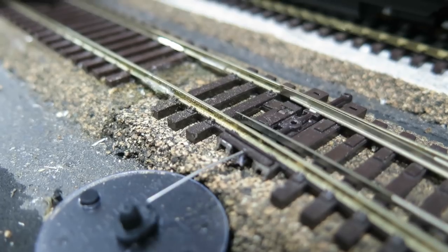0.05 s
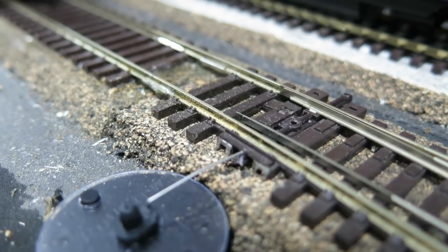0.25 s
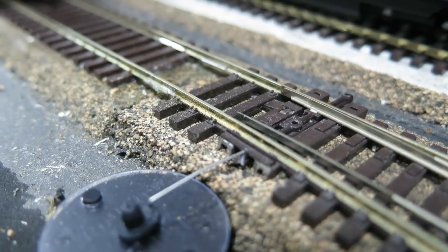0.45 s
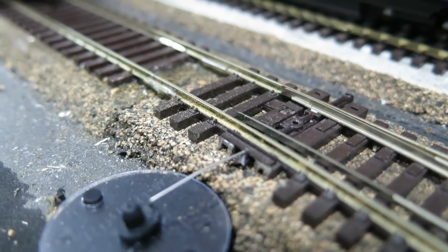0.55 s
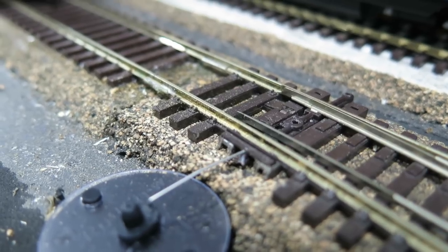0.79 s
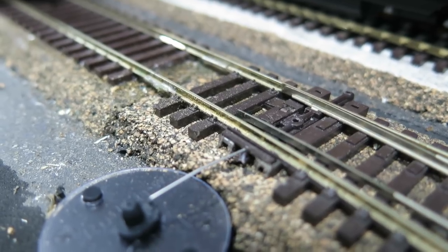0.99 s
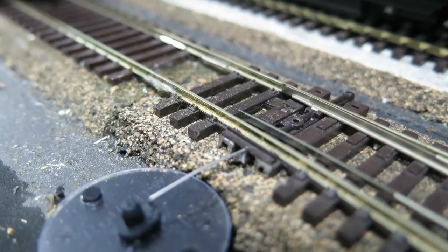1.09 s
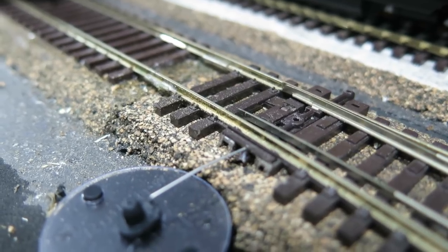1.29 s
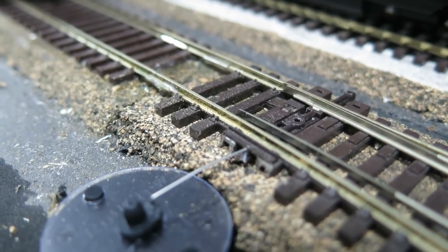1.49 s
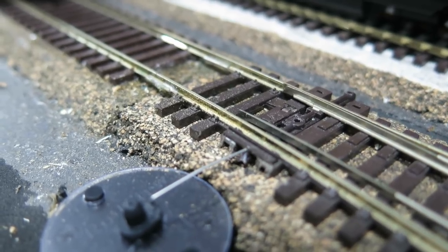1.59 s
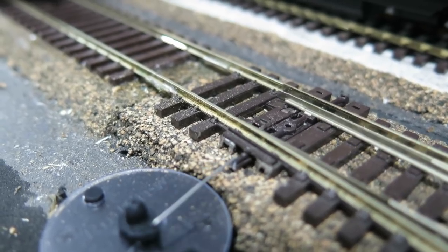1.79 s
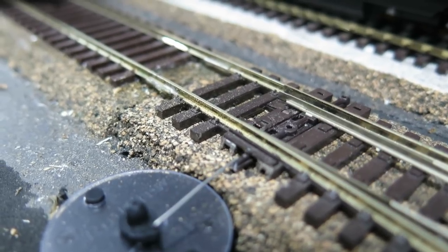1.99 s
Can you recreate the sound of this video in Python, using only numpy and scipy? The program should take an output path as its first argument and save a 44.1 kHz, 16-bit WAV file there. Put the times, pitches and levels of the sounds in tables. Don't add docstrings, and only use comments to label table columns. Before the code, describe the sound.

Close up in a small indoor room, a miniature track switch gives a faint tick, a sharp clack, lighter ticks, then a second clack and last ticks, over soft hiss that dips after each snap.

```python
import sys
import numpy as np
from scipy import signal
from scipy.fft import rfft, irfft
from scipy.io import wavfile
from scipy.ndimage import uniform_filter1d

SR = 44100
rng = np.random.default_rng(int(sys.argv[2]) if len(sys.argv) > 2 else 0)


def voltage_ratio(decibels):
    exponent = np.asarray(decibels, float) / 20
    return 10 ** exponent


def pcm_store(signal):
    levels = np.round(np.clip(np.atleast_2d(signal), -1, 1) * 32767)
    wavfile.write(sys.argv[1], SR, levels.astype(np.int16).T)


N = 90404


def evened(x):
    return x / np.sqrt(np.mean(x ** 2) + 1e-20)


def on_log_axis(points, hz):
    f, value = np.transpose(points)
    return np.interp(np.log(hz + 1), np.log(f + 1), value)


def add(mix, s, sound):
    part = mix[:, round(s * SR):][:, :sound.shape[1]]
    part += sound[:, :part.shape[1]]


def resonate(x, hz, width):
    turn = np.exp(2j * np.pi * hz * np.arange(len(x)) / SR)
    decay = np.exp(-np.pi * width / SR)
    envelope = signal.lfilter([1 - decay], [1, -decay], x / turn)
    return 2 * (turn * envelope).real


def hum():
    # f/Hz, bandwidth/Hz, level/dB
    partials = [(62.4, 6, -54), (108.3, 4, -57), (213.6, 20, -64)]
    total = 0
    for f, width, db in partials:
        once = resonate(rng.standard_normal(N), f, width)
        total = total + voltage_ratio(db) * evened(resonate(once, f, width))
    return total


def air():
    # f/Hz, density/dB per Hz
    spectrum = [(15, -46), (25, -8), (41, -9), (65, -5), (202, -6.5), (304, -10.5), (3510, -25.5),
                (15200, -36.5), (16500, -50.5)]
    # f/Hz, correlation
    likeness = [(60, 1), (130, 0.28), (290, 0.035), (640, 0.096), (1410, 0.12), (3100, 0.64), (6820, 0.63),
                (15000, -0.31)]
    level_db, patchy_db = -46.5, 1.0
    frames, hz = N // 512 + 5, np.fft.rfftfreq(2048, 1 / SR)
    a, b, c, d, patches = rng.standard_normal((frames, 1025, 5)).T
    patches = uniform_filter1d(patches, size=10, axis=0)
    patches = evened(uniform_filter1d(patches, size=5, axis=1))
    same = np.clip(on_log_axis(likeness, hz), -1, 1)[:, None]
    left = a + 1j * b
    right = same * left + np.sqrt(1 - same ** 2) * (c + 1j * d)
    z = np.array([left, right]) * voltage_ratio(on_log_axis(spectrum, hz)[:, None] + patchy_db * patches)
    wash = signal.istft(z, nperseg=2048, noverlap=1536)[1][:, :N]
    return voltage_ratio(level_db) * evened(wash)


def room(x):
    # f/Hz, T60/s
    t60 = [(250, 0.45), (700, 0.4), (1800, 0.26), (4600, 0.35), (12000, .2)]
    # f/Hz, level/dB
    tail_colour = [(250, -0.5), (1000, 4), (4000, 6), (9000, 2), (15000, 5)]
    level_db, same, onset_s = -6, 0.6, 0.0029
    a, b = rng.standard_normal((2, 20000))
    noise = [a, same * a + np.sqrt(1 - same ** 2) * b]
    hz, t, z = signal.stft(noise, SR, nperseg=128)
    decay_db = -60 * t / on_log_axis(t60, hz)[:, None]
    z = z * voltage_ratio(on_log_axis(tail_colour, hz)[:, None] + decay_db)
    tail = signal.istft(z, SR, nperseg=128)[1]
    tail = tail * np.minimum(np.arange(tail.shape[1]) / SR / onset_s, 1)
    tail = tail / np.linalg.norm(tail[0])
    return voltage_ratio(level_db) * signal.fftconvolve(x[None], tail, axes=1)[:, :N]


def near(x):
    level_db, t60_s, onset_s = -4.5, 0.05, 0.0008
    t = np.arange(4000) / SR
    tail = rng.standard_normal((2, len(t))) * voltage_ratio(-60 * t / t60_s) * np.minimum(t / onset_s, 1)
    tail = tail / np.linalg.norm(tail[0])
    return voltage_ratio(level_db) * signal.fftconvolve(x[None], tail, axes=1)[:, :N]


def ports(x):
    # f/Hz, left over right/dB
    balance = [(60, 5.5), (180, 10), (550, -1), (1650, 4.5), (4970, 0.5), (15000, -4.5)]
    lag_s = 2.4e-5
    hz = np.fft.rfftfreq(N, 1 / SR)
    half = voltage_ratio(on_log_axis(balance, hz) / 2) * np.exp(1j * np.pi * hz * lag_s)
    return irfft(rfft(x) * np.array([half, 1 / half]), N)


def duck_db(t):
    # t/s, depth/dB
    trips = [
        (0.216, 14.5),
        (1.755, 13.5),
    ]
    attack_s, hold_s, release_s = 0.0066, 0.15, 0.89
    loss = 0
    for s, depth_db in trips:
        age = np.maximum(t - s, 0)
        fall = 1 - np.exp(-age / attack_s)
        recovery = np.clip(1 - (age - hold_s) / release_s, 0, 1)
        loss = loss + depth_db * fall * recovery
    return loss


def ring(drive, bright_hz, spread, knock_db):
    # f/Hz, bandwidth/Hz, level/dB
    body = [(2270, 250, 1), (2980, 420, 3), (4400, 720, 1), (4930, 350, 3), (5620, 410, 4), (6870, 480, 4),
            (7570, 980, -2), (8500, 340, 1.5), (9200, 400, 3.5), (10750, 1100, 1.5), (12370, 560, -1.5),
            (13800, 900, -1.5), (15300, 610, -13)]
    # f/Hz, bandwidth/Hz, level/dB
    board = [(235, 53, -17.5), (690, 120, -4.5), (926, 130, -8.5), (1195, 87, -4), (1880, 190, -3.5)]
    board_hz, board_spread, around_db, around_top_hz = 1115, 1.377, -5.5, 10900
    modes = [(hz, w, db - 6 * (np.log2(hz / bright_hz) / spread) ** 2) for hz, w, db in body]
    modes += [(hz, w, db + knock_db + 5) for hz, w, db in board]
    front = 0
    for k, (hz, width, db) in enumerate(modes):
        front = front + (-1) ** k * voltage_ratio(db) * resonate(drive, hz, width)
    hz = np.fft.rfftfreq(len(drive), 1 / SR) + 1
    body_colour = voltage_ratio(-6 * (np.log2(hz / bright_hz) / spread) ** 2)
    board_colour = voltage_ratio(knock_db + 3.5 - 2.95 * (np.log2(hz / board_hz) / board_spread) ** 2)
    colour = (body_colour + board_colour) / (1 + (hz / around_top_hz) ** 4)
    delay = np.exp(-2j * np.pi * hz / 1000)
    around = irfft(rfft(drive) * colour * delay, len(drive))
    return np.array([front, voltage_ratio(around_db) * around])


def blow(s, db, bright_hz, spread, knock_db):
    chatter, chatter_s = 0.22, 0.00041
    t = np.arange(1500) / SR
    drive = (t == 0) + chatter * rng.standard_normal(len(t)) * np.exp(-t / chatter_s)
    sound = ring(drive, bright_hz, spread, knock_db)
    onset_rms = np.sqrt(np.mean(sound[0, :50] ** 2))
    return s, voltage_ratio(db + duck_db(s)) * sound / onset_rms


def board_thuds():
    thud_s = [
        .0901,
        .5142,
        2.0093,
    ]
    # level/dB, brightest f/Hz
    thud_rows = [(-39.5, 2120), (-34, 2100), (-40.5, 1900)]
    thuds = np.zeros((2, N))
    for s, row in zip(thud_s, thud_rows):
        add(thuds, *blow(s, *row, 0.55, 9.7))
    return thuds


def lever_ticks():
    tick_s = [.0893, .0899, .4672, .4684, .5134, 1.5987, 1.6341, 1.9933, 1.9964, 1.9969, 2.0087]
    # level/dB, brightest f/Hz, spread/octaves, low knock/dB
    tick_rows = [(-25, 12000, 2.3, -8.5), (-20.5, 12000, 3.2, -5.5), (-30.5, 8900, 0.83, -18),
                 (-26.5, 17000, 0.67, -12.5), (-22.5, 9100, 1.8, -13.5), (-46, 7300, .55, -32.5),
                 (-42, 7200, 0.49, -4.5), (-46.5, 1900, 1.4, 11.5), (-28, 9200, 0.49, -25),
                 (-26, 8400, 0.67, -5.5), (-29.5, 10000, 2.2, -1.5)]
    ticks = np.zeros((2, N))
    for s, row in zip(tick_s, tick_rows):
        add(ticks, *blow(s, *row))
    return ticks


def travel(start, end, start_db, end_db):
    rattle_per_s = 1600
    draw = rng.random((1500, 2))
    u = np.arange(1500) / SR / (end - start)
    knocks = (draw[:, 0] < rattle_per_s / SR) * (draw[:, 1] - 0.5) * (u < 1)
    sound = ring(knocks, 4400, 3.4, -17.5)
    sound = sound / np.sqrt(np.mean(sound[0, u < 1] ** 2))
    return start, sound * voltage_ratio(start_db + (end_db - start_db) * np.minimum(u, 1))


def switch_throws():
    out_s = [.2013, .2021, .2061, .2101, .2133, .2155, .2167, .2186, .2201]
    # level/dB, brightest f/Hz, spread/octaves, low knock/dB
    out_rows = [(-8, 7300, 0.56, -23), (-24, 9800, 2.9, -16.5), (-15.5, 7200, 1.1, -7),
                (-15.5, 19000, 3.9, -18.5), (-14.5, 6000, 0.37, 1), (-5.5, 4960, 0.27, -10),
                (2.5, 7600, 0.37, -13), (-19, 1700, 0.93, -33.5), (-28.5, 1400, .9, -26.5)]
    back_s = [1.7412, 1.7433, 1.7462, 1.7507, 1.7543, 1.7551, 1.7564, 1.7596, 1.7631, 1.7665]
    # level/dB, brightest f/Hz, spread/octaves, low knock/dB
    back_rows = [(-37, 5200, 1.2, -11), (-19.5, 7500, 1.1, -16.5), (-27, 1500, 1.1, -6.5),
                 (-21, 2000, 0.85, 2.5), (-4, 8300, 0.74, -23), (-1.5, 5200, 0.77, -17.5),
                 (-9.5, 3500, 0.57, -9), (-18.5, 3600, 1.05, -5), (-20.5, 6500, 1.1, -9),
                 (-22.5, 8300, 0.18, -19.5)]
    # start t/s, end t/s
    spans = [
        (.203, .2155),
        (1.744, 1.7545),
    ]
    # start level/dB, end level/dB
    rattle_rows = [(-33.5, -18.5), (-24.5, -25.5)]
    throw_knock_db = -4
    throws = np.zeros((2, N))
    for moments, rows in [(out_s, out_rows), (back_s, back_rows)]:
        for s, (db, bright_hz, spread, knock_db) in zip(moments, rows):
            add(throws, *blow(s, db, bright_hz, spread, knock_db + throw_knock_db))
    for span, row in zip(spans, rattle_rows):
        add(throws, *travel(*span, *row))
    return throws


def scene():
    ticks = lever_ticks()
    throws = switch_throws()
    background = air() + hum()
    ticks = ticks + board_thuds()
    front, around = ticks + throws
    tick_room_db = -2
    to_room = throws[1] + voltage_ratio(tick_room_db) * ticks[1]
    return ports(front) + near(around) + room(to_room) + background


def top_cut(x):
    return signal.sosfilt(signal.butter(12, 16980, fs=SR, output="sos"), x)


def record(dry):
    low_cut_hz, edge_hz, ceiling = 48, 16300, 0.9
    cut = signal.sosfilt(signal.butter(2, low_cut_hz, "high", fs=SR, output="sos"), dry)
    cut = signal.sosfilt(signal.butter(8, edge_hz, fs=SR, output="sos"), cut)
    ducked = cut / voltage_ratio(duck_db(np.arange(N) / SR))
    mix = ceiling * np.tanh(ducked / ceiling)
    return top_cut(mix)


dry = scene()
out = record(dry)
pcm_store(out)
```